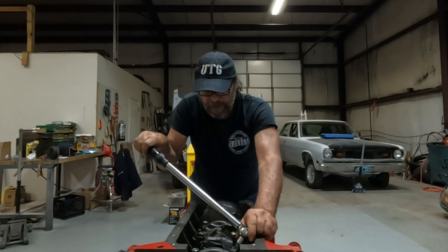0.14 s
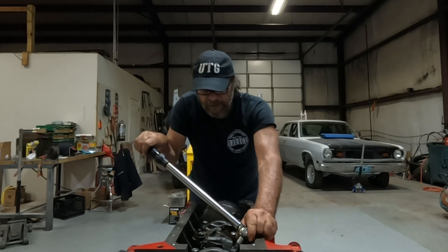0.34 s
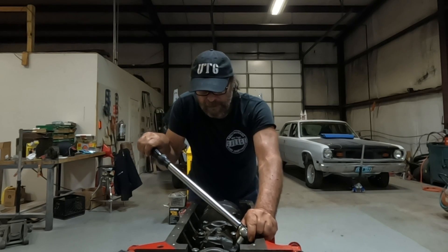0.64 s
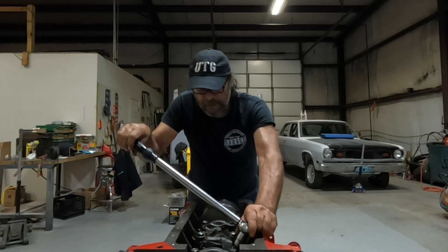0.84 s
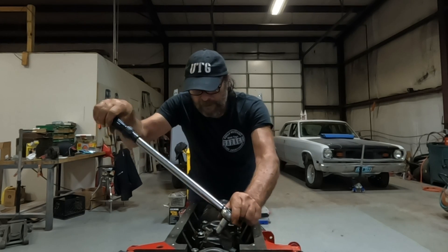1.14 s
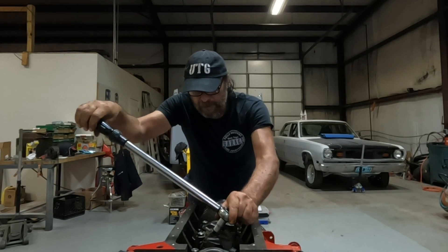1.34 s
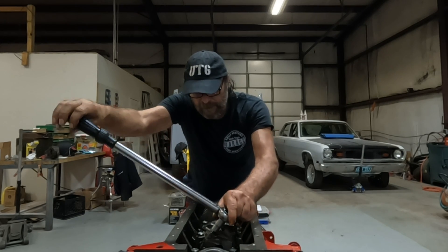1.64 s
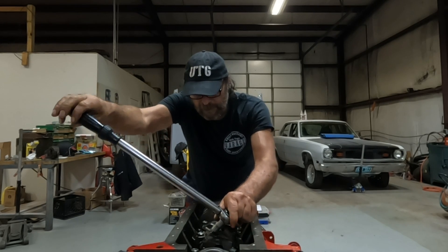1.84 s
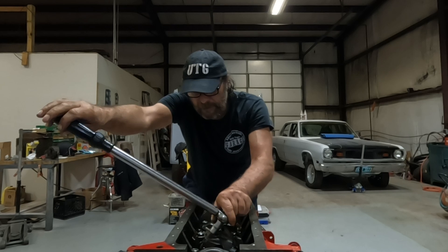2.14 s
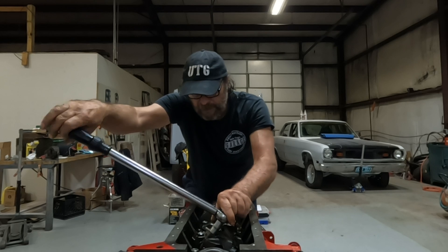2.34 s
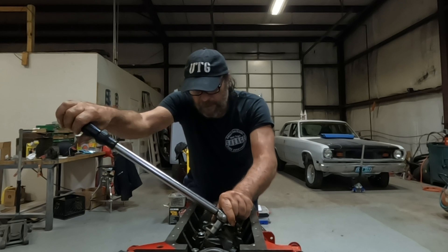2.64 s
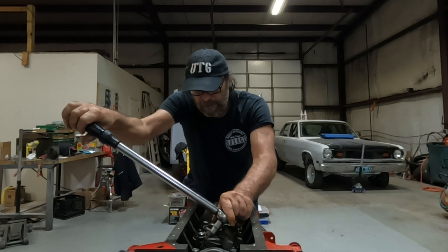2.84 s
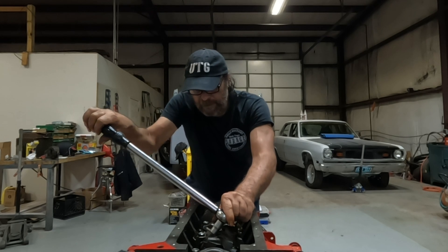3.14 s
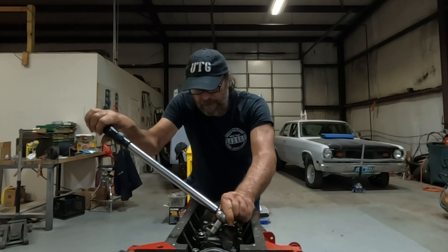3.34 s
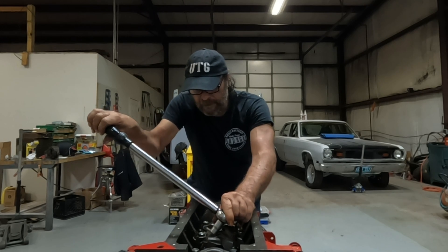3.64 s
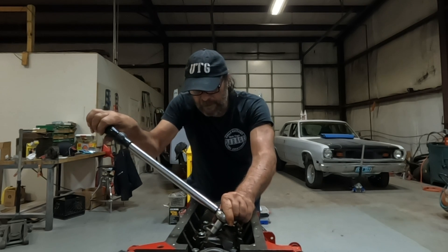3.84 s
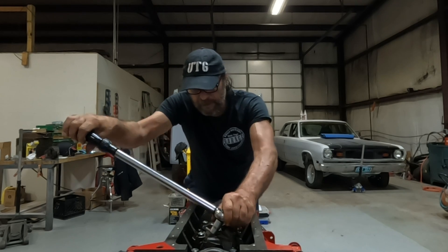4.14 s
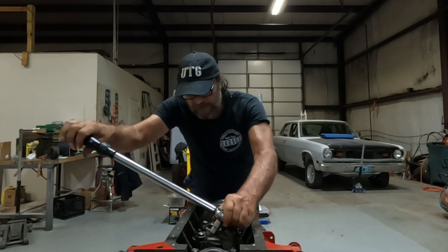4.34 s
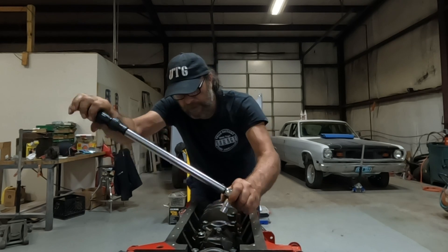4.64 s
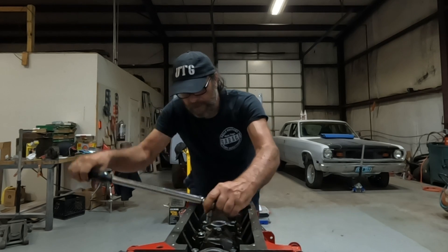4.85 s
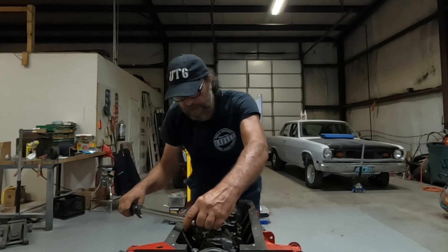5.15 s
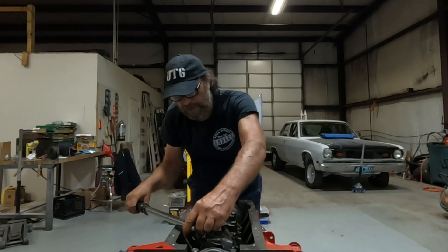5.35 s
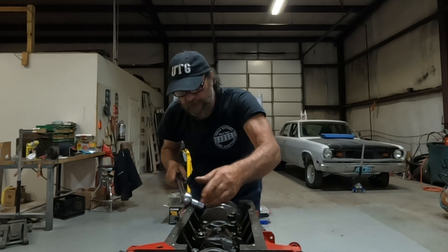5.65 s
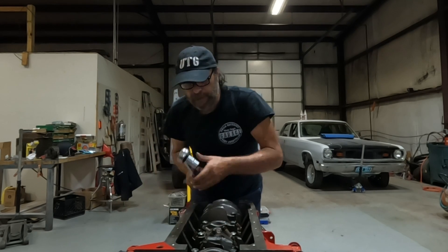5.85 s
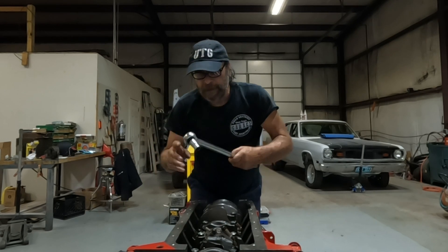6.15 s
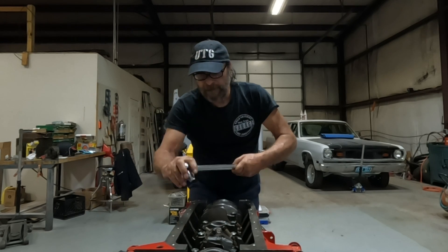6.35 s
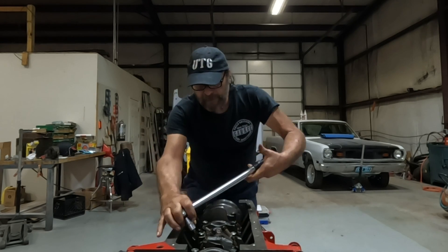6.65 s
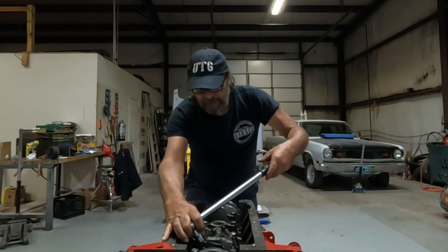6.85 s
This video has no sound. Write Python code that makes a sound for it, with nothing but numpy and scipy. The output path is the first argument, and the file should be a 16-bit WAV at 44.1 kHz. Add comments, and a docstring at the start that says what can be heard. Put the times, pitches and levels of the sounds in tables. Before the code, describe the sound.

Close to the microphone, a torque wrench gives two very loud, sharp snap-and-return clicks, then a few quiet ratchet ticks and a moderate clunk. Two more snap-and-return pairs follow, brighter and harder. Finally the socket knocks softly against a nut with barely audible cloth brushing. A large steel-walled shop answers each snap with a short bright tail; faint hum, air hiss and passing road noise lie far beneath.

```python
"""A click-type torque wrench on an engine block, half a metre from a small camera in a large steel-walled shop.
First the cam snaps over and back twice, handle raised; then the ratchet pawl ticks and the drive clunks.
The cam snaps twice more, handle lowered; last the socket knocks on a nut while hands and sleeves brush the tool.
Contacts, some led in by faint ticks, are noise bursts and damped modes with floor and hall; the handle rings on.
Behind it all two motors hum far off, shop air hisses and road noise swells through the doors: sines and noise."""
import sys
import numpy as np
from scipy import signal
from scipy.fft import rfft, irfft, next_fast_len
from scipy.io import wavfile
from scipy.ndimage import map_coordinates

SR = 44100
rng = np.random.default_rng(int(sys.argv[2]) if len(sys.argv) > 2 else 0)


def unload_wav(signal):
    """Save mono or channel-first audio to the path in sys.argv[1] as 16-bit WAV at rate SR, clipped to [-1, 1]."""
    wavfile.write(
        sys.argv[1],
        SR,
        np.round(np.clip(np.atleast_2d(signal).T, -1, 1) * 32767).astype(np.int16),
    )


N = 308700
LEAD = 4410  # samples kept ahead of the start, for sounds already under way

# When the wrench sounds; all levels are ahead of the microphone.
# The cam snaps over at the set torque. Each row: start in seconds, peak in dB, handle lowered 0-1.
SNAPS = [(-0.0081, -1, 0.04), (0.507, -1.5, 0.07), (3.1446, -1, 0.61), (3.6775, -3, 0.58)]
# The cam snaps back as the pull eases. Each row: start in seconds, peak in dB, handle lowered 0-1.
RESETS = [(0.185, -4.5, 0.13), (0.705, -4, 0.1), (3.428, -5, 0.8), (3.956, -5.5, 0.82)]
# The pawl drops over a ratchet tooth. Each row: start in seconds, peak in dB, brightness in dB per octave.
TICKS = [(1.101, -19.5, 6), (1.271, -21.5, 2.4), (1.518, -23.5, -2), (1.692, -29.5, 3.8)]
# Three faint ticks lead into some contacts. Each row: last tick in seconds, its peak in dB,
# dB fainter per earlier tick.
LEAD_INS = [(1.681, -37.5, 26.5), (2.106, -41.5, 8), (3.134, -25.5, 12.5), (3.666, -36, 17.5)]
LEAD_IN_GAP = .0112  # s
# The drive takes up its slack. One row: start in seconds, peak in dB.
CLUNK = (2.118, -10.5)
# The socket knocks on a nut. Each row: start in seconds, peak in dB, brightness in dB per octave, strongest Hz.
KNOCKS = [(4.509, -48.5, -11, 1505), (4.558, -43.5, -3.5, 2850), (5.298, -32, 5.7, 2900),
          (5.306, -31.5, -4.5, 2750), (5.315, -23, 5, 3350), (5.463, -33.5, -1, 3300),
          (5.489, -30, -4.2, 3070), (6.682, -39, -6, 2120), (6.914, -24, -0.2, 2370),
          (6.992, -31, -1.5, 2350)]
FOCUS_DB, FOCUS_OCTAVES = 9.5, 0.37  # height and half-width of a knock's strongest band

# Colour of each kind of contact. COLOUR_HZ holds the frequencies in Hz; the others hold dB at each of them.
COLOUR_HZ = [330, 800, 1000, 1750, 2300, 2850, 3450, 4200, 5500, 7100, 11500]
# For the cam, first row with the handle raised, second row lowered.
SNAP_COLOUR = [(-38.5, -23.5, -20, -21.5, -9, -7, -11, -9.5, -17.5, -22, -27),
               (-38.5, -35.5, -24.5, -26, -22.5, -17, -16, -6, -20, -18.5, -20.5)]
RESET_COLOUR = [(-45, -23.5, -27, -19, -13, -10.5, -8.5, -16, -22.5, -30, -39.5),
                (-35, -27, -38.5, -14.5, -26.5, -21.5, -10.5, -14, -17, -29.5, -31.5)]
TICK_COLOUR = (-46.5, -33, -31.5, -18, -15, -13, -11.5, -20, -19.5, -30, -42)
LEAD_IN_COLOUR = (-34, -22, -16, -18.5, -17.5, -16, -12, -9, -13, -16, -22)
CLUNK_COLOUR = (-34.5, -24, -22, -21.5, -24.5, -17.5, -17.5, -20, -18, -30.5, -30)
KNOCK_COLOUR = (-38, -41, -26, -18, -18.5, -16, -17.5, -19, -18.5, -29, -40)

# How each kind dies. Each row: factor on dying times, rebound in dB, shudder in dB, floor echo in dB,
# share of its modes in the hall (clipped to 0-1), treble beamed at the camera in dB, hall in dB.
# For the cam, first row with the handle raised, second row lowered.
SNAP_DIES = [(1.5, -17.5, -14, -20.5, 0.5, -0.8, 0.7), (1.3, -24, -26, -16, 0, 9, 3.5)]
RESET_DIES = [(1.9, -10, -7, -17, 0.31, -2.34, -0.025), (1.3, -16, -17.5, -18.5, 0.47, 4.5, -1.5)]
TICK_DIES = (1.63, -14.5, -2.5, -27, -1.3, 1, 1.7)
LEAD_IN_DIES = (2.3, -19, -15, -22.5, 0, -2.5, 2.5)
CLUNK_DIES = (1.3, -12, -4, -31, -0.13, 1, 1.75)
KNOCK_DIES = (1.6, -12, -3.5, -25, 0, -1.5, 3.5)

# Modes of head, socket and block. Each row: frequency in Hz, dB on top of the contact's colour,
# t60 in seconds before the dying factor.
HEAD = [(325.5, -3.5, 0.061), (706, -15, 0.086), (848, -7, 0.055), (986, -7, 0.038), (1140, -9, 0.03),
        (1500, -11, 0.02), (1798, 2.5, 0.013), (2117, -3, 0.015), (2476, -3, 0.013), (2797, -1, 0.014),
        (3080, -2, 0.012), (3420, 3.5, 0.006), (4090, 3, 0.0093), (4520, 0.5, 0.012), (4970, -4.5, .012),
        (5270, 1.5, 0.0029), (6100, -6.5, 0.012), (6400, -0.5, .009), (7020, 4.5, 0.0057),
        (7200, -9.5, 0.0066), (12000, -13.5, 0.016), (11170, -1, 0.01), (12770, -7.5, 0.012)]
# Modes of the long handle, in Hz.
BAR_HZ = [2384, 2487, 2616, 10570, 11090, 1800, 3380]
# The same modes. Each row: dB within its group, t60 in seconds.
BAR = [(-7, .15), (0, .3), (-15, .2), (-1, .17), (-7.5, .1), (-1, .16), (0, .18)]
# The handle's ring re the cam's peak, raised then lowered. Each row: low group, high pair, side pair, all in dB.
SNAP_RING = [(-22.5, -41.5, -50), (-45.5, -34.5, -44.5)]
RESET_RING = [(-26.5, -47, -45), (-43, -43.5, -29)]
TRAVEL, RING_DELAY = .0014, .002  # s: contact to microphone, about half a metre; onset of the handle's ring
# Small parts radiate little deep bass. Each row: frequency in Hz, gain in dB.
RADIATION = [(60, -40), (250, 0)]
# The beamed treble sets in between these two frequencies, in Hz.
BEAM_HZ = [5000, 7450]
REBOUND, FLOOR_ECHO = .0055, .0143  # s after the first blow
# The concrete floor returns the treble best. Each row: frequency in Hz, gain in dB.
ECHO_COLOUR = [(4000, -20), (7000, 0), (12000, 0)]

# How the hall dies. Each row: frequency in Hz, t60 in seconds.
HALL = [(250, 0.9), (800, 0.24), (2000, 0.59), (4000, 0.82), (7000, 0.82), (12000, 0.57)]
# How loud the hall answers. Each row: frequency in Hz, gain in dB.
HALL_DB = [(250, -8), (800, -8.5), (2000, -11.5), (4000, -14.5), (7000, -12), (12000, -13.5)]

# Hands and sleeves brush the tool. Each row: time of the peak in seconds, level in dB rms before its flutter.
RUSTLE = [(5.52, -85), (6.054, -78), (6.55, -89.5), (6.7, -76)]
BRUSH_RISE, BRUSH_FALL = 90, 67  # dB per s
# Spectrum of the brushing. Each row: frequency in Hz, relative density in dB per Hz.
CLOTH = [(800, -39.5), (2500, -22), (5000, 1), (8000, 12), (14000, -1)]
# Road through the doors. Each row: time in seconds, drone in dB rms, tyre hiss in dB rms, before their flutter.
ROAD = [(0.0, -55, -53.5), (0.39, -55, -59), (0.53, -54.5, -55.5), (0.74, -53, -57.5), (0.92, -57.5, -61),
        (2.01, -58.5, -63.5), (2.24, -61.5, -61.5), (2.59, -60.5, -64.5), (3.06, -61, -64),
        (3.39, -63, -60), (4.31, -64.5, -65.5), (4.78, -63.5, -66.5), (5.13, -63.5, -63.5),
        (5.56, -66, -55.5), (6.38, -63, -61), (7.0, -70, -59.5)]
DEEP_DB, DEEP_GROWS = -12, 1.3  # the deep rumble lies this far under the drone and swings wider by this factor
# Spectra of deep rumble, drone and tyre hiss. Each row: frequency in Hz, relative density in dB per Hz.
DEEP = [(30, -19.5), (50, -2), (70, 0), (100, -13), (200, -57)]
RUMBLE = [(60, -27.5), (100, -7.5), (170, 1), (230, -2.5), (300, -11), (500, -23.5), (900, -74)]
HISS = [(240, -34), (400, -15.5), (746, -7), (835, -8.5), (1230, -0.5), (2090, -2.5), (3220, -18),
        (6000, -21.5), (7800, -57), (13200, -120)]
# Two far motors almost in tune: their frequencies in Hz, then their levels in dB rms.
HUM_HZ = [235.56, 240.06]
HUM_DB = [-68.5, -68.5]
HUM_IN_STEP = .097  # s: first swell of their beat
# Spectrum of shop air and preamp. Each row: frequency in Hz, relative density in dB per Hz.
AIR = [(150, -31.5), (400, -2), (1000, -3.5), (2000, -11), (4000, -12.5), (7000, -27.5), (11000, -35.5),
       (14000, -47)]

# Difference between the two ports. Each row: frequency in Hz, side minus mid in dB.
SIDE_DB = [(60, -35.5), (300, -35.5), (2000, -62), (5000, -45), (8000, -23.5), (11000, -18), (13000, -6)]
# The microphone in its housing. Each row: frequency in Hz, gain in dB.
MIC = [(20, -30.5), (50, 4), (7500, -2), (8500, -12), (9100, -21), (9800, -8.5), (11200, 4.5),
       (12200, -8.5), (13000, -10), (13600, -15), (14400, -25.5)]
TOP_HZ = 14400


def amp(db):
    """Decibels to amplitude."""
    return 10 ** (np.asarray(db) / 20)


def unit(x):
    """x scaled to an rms of 1."""
    return x / np.sqrt(np.mean(x ** 2) + 1e-20)


def along(points, hz):
    """Read (Hz, value) points at hz, straight lines on a log frequency axis."""
    f, v = np.transpose(points)
    return np.interp(np.log(hz + 1), np.log(f + 1), v)


def wobble(rate):
    """A smooth random curve with rate knots a second."""
    knots = rng.standard_normal(int(N * rate / SR) + 4)
    return map_coordinates(knots, [np.arange(N) * rate / SR])


def coloured(x, points, causal=False):
    """x through a (Hz, dB) spectrum; causal = minimum phase, by folding the cepstrum."""
    m = 2 * next_fast_len(x.shape[-1] // 2 + 8192)
    log_gain = np.log(amp(along(points, np.fft.rfftfreq(m, 1 / SR))))
    if causal:
        cepstrum = irfft(log_gain, m)
        cepstrum[1:m // 2] *= 2
        cepstrum[m // 2 + 1:] = 0
        log_gain = rfft(cepstrum)
    return irfft(rfft(x, m) * np.exp(log_gain), m)[..., :x.shape[-1]]


def ringing(hz, db, t60, t):
    """Struck modes: damped sines at slightly new strengths and phases, summed."""
    hz, db, t60 = (np.asarray(v)[:, None] for v in (hz, db, t60))
    scatter, phase = rng.standard_normal((2, len(hz), 1))
    strength = amp(db + 1.5 * scatter - 60 * t / t60)
    return np.sum(strength * np.sin(2 * np.pi * hz * t + .7 * phase), axis=0)


def wrench():
    """Steel contacts, lead-in ticks and the handle's ring, each laid in at its time of arrival."""
    out = np.zeros(N + LEAD + 2 * SR)
    moves = cam_moves()
    hits = [move[:4] for move in moves] + ticks() + knocks() + clunk() + lead_ins()
    for s, peak_db, colour_db, dies in hits:
        heard = contact([(100, -90), *zip(COLOUR_HZ, colour_db)], *dies)
        out[round((s + TRAVEL) * SR) + LEAD:][:SR] += amp(peak_db) * heard
    for s, peak_db, _, _, ring_db in moves:
        out[round((s + RING_DELAY) * SR) + LEAD:][:SR] += handle_ring(peak_db, ring_db)
    return out[LEAD:LEAD + N]


def cam_moves():
    """The cam snapping over and back; colour, decay and ring shift as the handle is lowered."""
    def blend(pair, lowered):
        raised_row, lowered_row = np.asarray(pair)
        return raised_row + np.clip(lowered, 0, 1) * (lowered_row - raised_row)

    kinds = ((SNAPS, SNAP_COLOUR, SNAP_DIES, SNAP_RING), (RESETS, RESET_COLOUR, RESET_DIES, RESET_RING))
    return [(s, db, blend(colour, low), blend(dies, low), blend(ring, low))
            for rows, colour, dies, ring in kinds for s, db, low in rows]


def tilt(db_per_octave):
    """Brightness as a slope about the middle of the colour frequencies, in dB."""
    return db_per_octave * np.log2(np.divide(COLOUR_HZ, np.median(COLOUR_HZ)))


def ticks():
    """The pawl dropping over ratchet teeth, each drop brighter or duller."""
    return [(s, db, TICK_COLOUR + tilt(bright), TICK_DIES) for s, db, bright in TICKS]


def knocks():
    """The socket knocking on a nut, each knock strongest in a band of its own."""
    def focus(hz):
        octaves_off = np.log2(np.divide(COLOUR_HZ, hz))
        return FOCUS_DB * np.exp(-(octaves_off / FOCUS_OCTAVES) ** 2)

    return [(s, db, KNOCK_COLOUR + tilt(bright) + focus(hz), KNOCK_DIES) for s, db, bright, hz in KNOCKS]


def clunk():
    """The drive taking up its slack in one contact."""
    return [(*CLUNK, CLUNK_COLOUR, CLUNK_DIES)]


def lead_ins():
    """Three faint, evenly spaced ticks lead into some contacts, each louder than the last."""
    return [(s - k * LEAD_IN_GAP, db - k * fainter_db, LEAD_IN_COLOUR, LEAD_IN_DIES)
            for s, db, fainter_db in LEAD_INS for k in range(3)]


def contact(colour, dying, rebound_db, shudder_db, echo_db, modal, beam_db, hall_db):
    """One steel contact, peak near 1: a snap on the head's modes, a rebound, the block's shudder, floor and hall."""
    t = np.arange(SR // 10) / SR
    head_hz, head_db, head_t60 = np.transpose(HEAD)

    def burst(t60):
        return coloured(rng.standard_normal(len(t)) * amp(-60 * t / t60), colour, causal=True)

    clank = np.zeros(SR // 5)
    impulse = np.eye(1, len(clank))[0]
    snap = coloured(impulse, colour, causal=True)
    for delay, db in ((0, 0), (REBOUND, rebound_db)):
        blow = ringing(head_hz, head_db + along(colour, head_hz), head_t60 * dying, t)
        blow *= 1 - np.exp(-t / 0.00063)  # the modes take a moment to speak
        blow += 2.9 * burst(0.0035 * dying) + 8 * snap[:len(t)]
        clank[round(delay * SR):][:len(t)] += amp(db) * blow / np.abs(blow).max()
    shudder = burst(0.08)
    clank[:len(t)] += amp(shudder_db) * shudder / np.abs(shudder).max()
    clank = coloured(clank, RADIATION, causal=True)
    # summed over all directions the steel radiates a smoother spectrum than reaches the camera directly
    spread = snap * np.linalg.norm(clank) / np.linalg.norm(snap)
    modal = np.clip(modal, 0, 1)
    heard = amp(hall_db) * hall(modal * clank + np.sqrt(1 - modal ** 2) * spread)
    direct = coloured(clank, list(zip(BEAM_HZ, (0, beam_db))), causal=True)
    floor = coloured(direct, ECHO_COLOUR, causal=True)
    heard[:len(direct)] += direct
    heard[round(FLOOR_ECHO * SR):][:len(floor)] += amp(echo_db) * floor
    return heard


def handle_ring(peak_db, ring_db):
    """The long handle's modes ringing after the cam, fluttering in the gripping hand, with the hall's answer."""
    t = np.arange(SR // 2) / SR
    bar_db, bar_t60 = np.transpose(BAR)
    group_db = np.repeat(ring_db, [3, 2, 2])  # low group, high pair, side pair
    ring = ringing(BAR_HZ, peak_db + bar_db + group_db, bar_t60, t)
    ring *= 1 - np.exp(-t / 0.0016)
    ring *= amp(3 * wobble(70)[:len(t)])
    heard = hall(ring)
    heard[:len(t)] += ring
    return heard


def hall(x):
    """A fresh diffuse tail that builds up as the far walls answer; each frequency dies at its own speed."""
    hz, t, z = signal.stft(rng.standard_normal(SR), SR, nperseg=128)
    build = 0.083 + np.clip((t - .024) / 0.0024, 0, 1)  # faint at first, full after 26 ms
    decay = amp(-60 * t / along(HALL, hz)[:, None]) * build
    decay *= amp(along(HALL_DB, hz))[:, None] / np.linalg.norm(decay, axis=1, keepdims=True)
    tail = signal.istft(z * decay, SR, nperseg=128)[1]
    return signal.fftconvolve(x, tail * np.sqrt(2 / 128))[:SR]


def noise(points):
    """Steady noise of rms 1 with the given spectrum."""
    return unit(coloured(rng.standard_normal(N), points))


def rustle(t):
    """Hands and sleeves on the tool: cloth noise that swells and falls in straight dB slopes, fluttering."""
    brush = sum(amp(db - np.maximum(BRUSH_RISE * (at - t), BRUSH_FALL * (t - at))) for at, db in RUSTLE)
    return brush * amp(3.0 * wobble(60)) * noise(CLOTH)


def road(t):
    """Deep rumble, drone and tyre hiss: three noise bands that swell and fade with a slight flutter."""
    s, drone_db, tyre_db = np.transpose(ROAD)
    mean_db = drone_db.mean()
    deep_db = mean_db + DEEP_DB + DEEP_GROWS * (drone_db - mean_db)
    out = np.zeros(N)
    for db, points in ((deep_db, DEEP), (drone_db, RUMBLE), (tyre_db, HISS)):
        level_db = np.interp(t, s, db) + 0.48 * wobble(15) + 0.76 * wobble(13)
        out += amp(level_db) * noise(points)
    return out


def motors(t):
    """Two far motors almost in tune: two steady sines that beat together."""
    return sum(np.sqrt(2) * amp(db) * np.sin(2 * np.pi * hz * (t - HUM_IN_STEP))
               for hz, db in zip(HUM_HZ, HUM_DB))


def shop_air():
    """Steady hiss of shop air and preamp, in dB rms."""
    return amp(-66) * noise(AIR)


def background():
    """Soft handling, road, motors and air added together."""
    t = np.arange(N) / SR
    return rustle(t) + road(t) + motors(t) + shop_air()


def scene():
    """Nearly mono: the two ports part only a little, the wrench most in the treble."""
    clicks, room = wrench(), background()
    click_side = coloured(np.roll(clicks, 40), SIDE_DB)
    room_side = amp(-33) * np.roll(room, SR // 5)  # shifted far enough to sound unrelated
    side = click_side + room_side
    return np.array([clicks + room + side, clicks + room - side])


def record(dry):
    """The housing cuts a notch and a peak into the treble; a steep edge cuts off all above the band limit."""
    heard = coloured(dry, MIC, causal=True)
    return coloured(heard, [(TOP_HZ, 0), (TOP_HZ + 100, -55)])


dry = scene()
out = record(dry)
unload_wav(out)
```